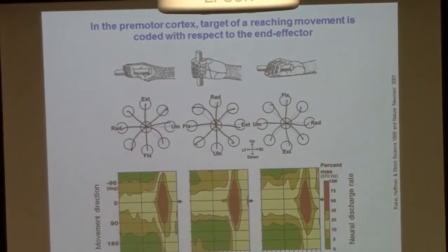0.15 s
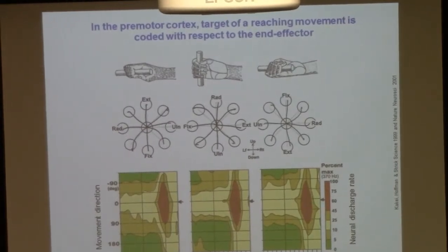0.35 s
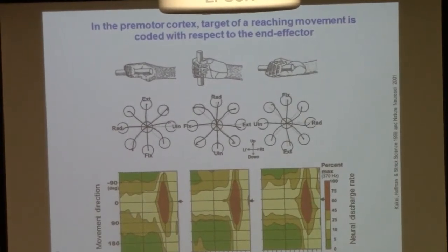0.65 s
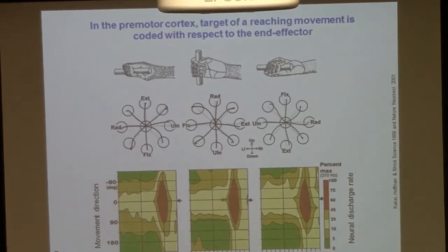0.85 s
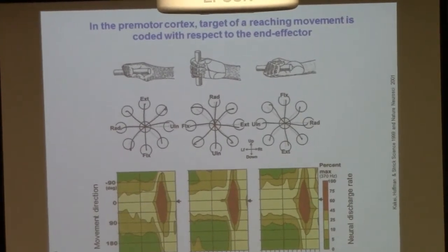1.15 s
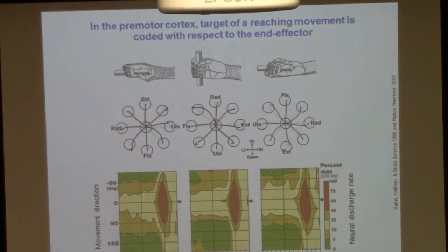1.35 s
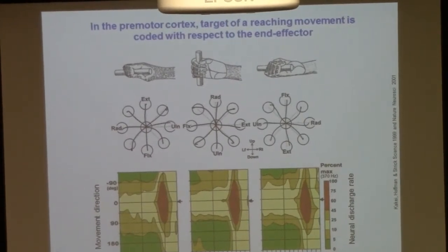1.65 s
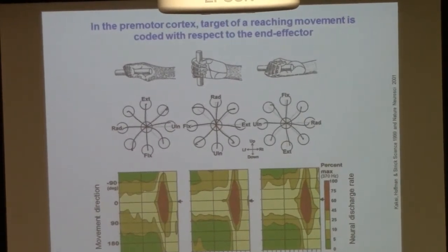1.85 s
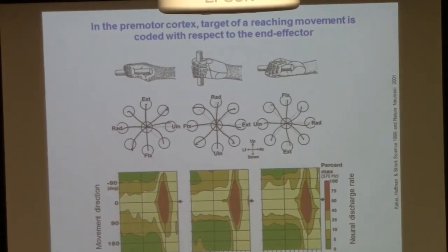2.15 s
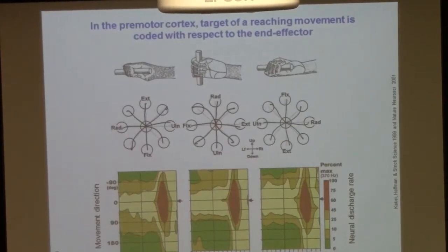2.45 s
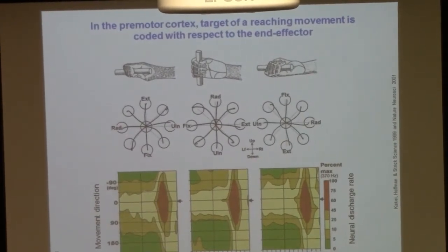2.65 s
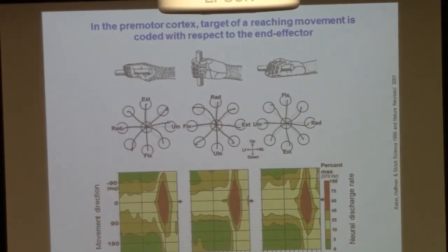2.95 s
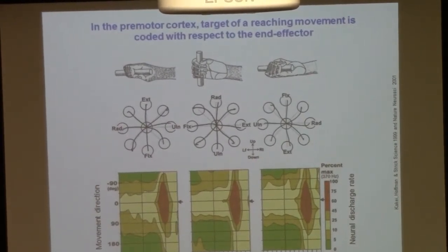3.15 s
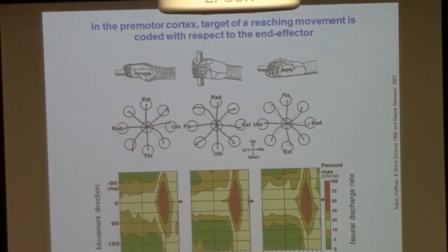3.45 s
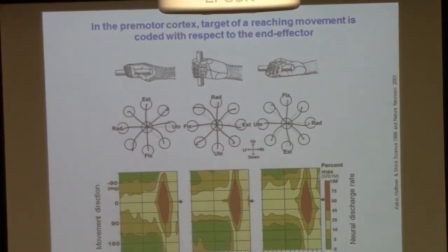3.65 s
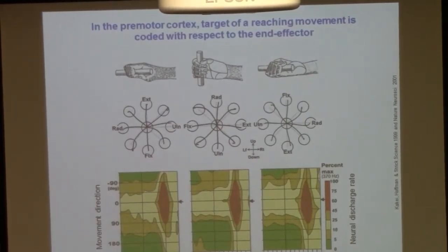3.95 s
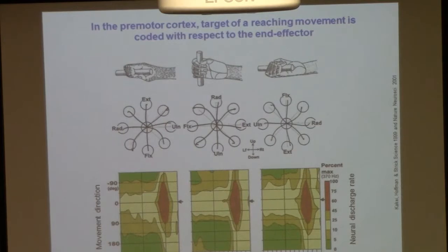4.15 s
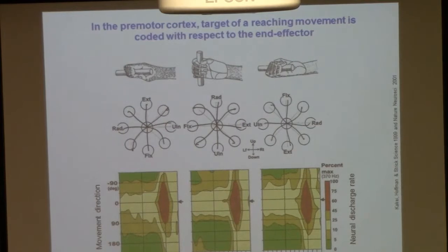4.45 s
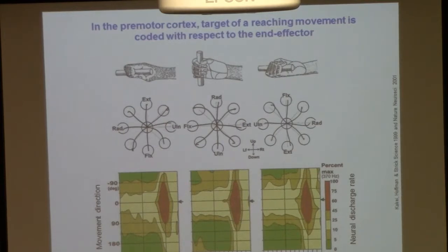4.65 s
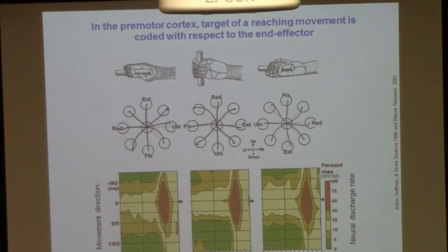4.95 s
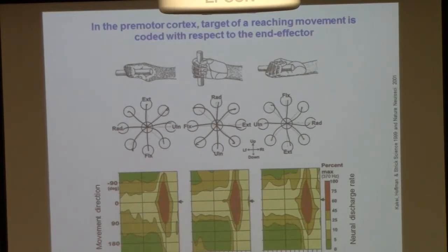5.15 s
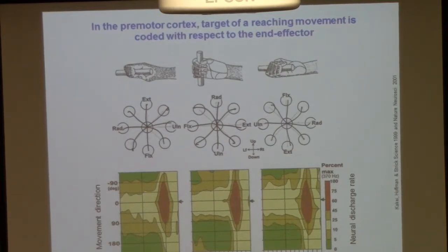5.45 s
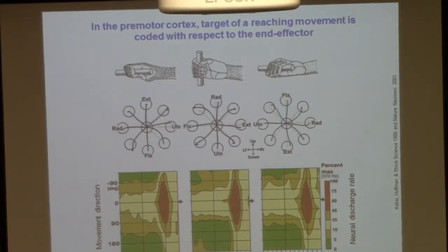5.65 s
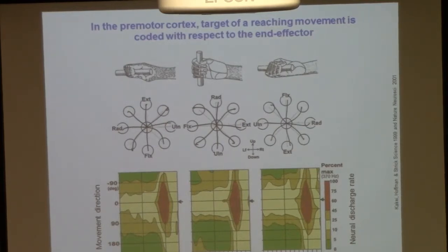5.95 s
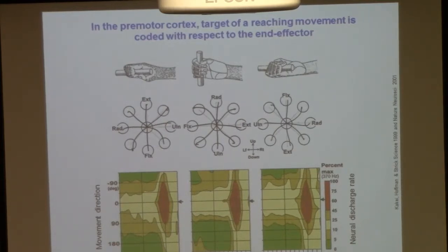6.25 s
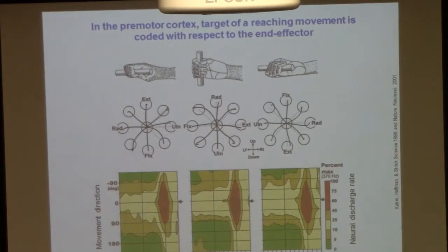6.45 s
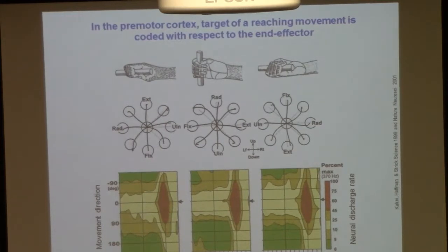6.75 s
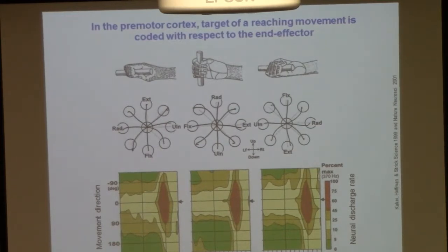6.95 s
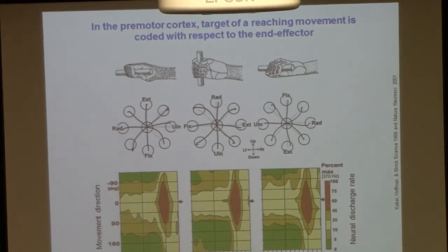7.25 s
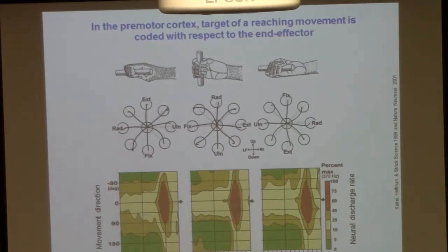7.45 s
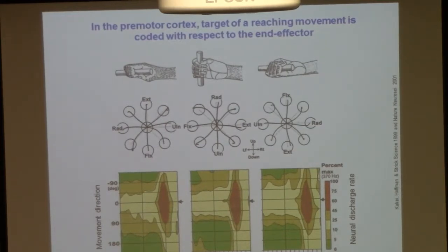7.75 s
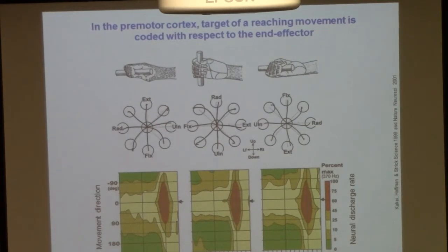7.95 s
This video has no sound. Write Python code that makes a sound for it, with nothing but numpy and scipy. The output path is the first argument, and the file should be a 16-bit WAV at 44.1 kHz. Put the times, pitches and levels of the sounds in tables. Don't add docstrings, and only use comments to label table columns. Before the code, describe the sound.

Electrical interference from an audio lead: steady sixty-cycle buzz with sharp, fizzy edges, faint ground hum and preamplifier hiss. Two quick bursts of contact crackle open it, the first with a dull pop, the second lighter and longer, firmer at its end. Then the buzz continues alone, shifting slightly in strength and left-right balance, loudest near six seconds, weaker near seven. Close, dry and quiet, without any audible room or talking.

```python
import sys
import numpy as np
from scipy import signal
from scipy.fft import rfft, irfft
from scipy.io import wavfile

SR = 44100
rng = np.random.default_rng(int(sys.argv[2]) if len(sys.argv) > 2 else 0)


def generate_wav(sig):
    pcm = np.round(np.clip(np.atleast_2d(sig).T, -1, 1) * 32767).astype(np.int16)
    wavfile.write(sys.argv[1], SR, pcm)


def convert_level_to_amplitude(level_db):
    exponent = np.asarray(level_db, float) / 20
    return 10 ** exponent


N = 357210

MAINS_HZ, FIRST_ON_S = 59.9961, 0.01417
# after_turn_on_ms, step_size, spike_size
SWITCH_EDGES = [(-0.024, 2.677, 0.621), (0.02, 2.557, -1.066), (0.439, 0.803, 0.471), (0.829, 0.79, 0.637),
                (1.438, 0.907, -0.058), (2.522, -1.399, 0.061), (2.673, -4.675, -1.008),
                (5.515, -0.737, -0.375)]
# start_ms, length_ms, size
MAGNETISING = (-2.13, 4.91, 1.58)
# start_ms, size, time_constant_ms
CHARGE_DRAIN = (2.673, 4.072, 1.164)
# centre_hz, width_hz
RESONANCES = [
    (2982, 1409),
    (7920, 4894),
    (1714, 671),
]
OPPOSED_SHARE, BYPASS_SHARE = 0.237, 0.12

RESTING_DB = -58
# start_s, travel_s, arrival_pickup_db (third order)
HAND_MOVES = [(.36, 0.11, -60.5), (.46, .12, -58), (3.33, .15, -57), (3.52, .16, -58.5), (3.68, .14, -62.5),
              (5.28, .1, -61), (5.37, 0.092, -58), (5.47, 0.28, -55.5), (5.72, 0.18, -53),
              (6.75, 0.21, -60), (6.93, 0.21, -62.5), (7.9, 0.28, -56)]
# pickup_db, left_over_right_db
CHANNEL_LEAN = [(-62.5, 1), (-58.5, 1.9), (-56.5, 1.6), (-53, -1.1)]

# start_s, length_s, grit_db, thump_db
PLUG_SCRATCHES = [
    (0.052, 0.04, -51, -53),
    (.073, 0.0064, -50, -64),
    (0.653, 0.049, -58.5, -69),
    (0.702, .04, -57.5, -64),
    (0.744, 0.065, -65.5, -58),
    (0.786, 0.078, -60, -61),
    (0.844, 0.046, -53, -57),
    (0.875, 0.017, -52, -62),
]
FIRM_DB, CORNER_HZ, CORNER_OCT_PER_DB = -52.5, 800, 0.06
TOP_HZ, TOP_OCT_PER_DB = 8100, 0.53
THUMP_HZ = 150
# start_s, level_db
CONTACT_RESEATS = [
    (0.0855, -43),
    (.888, -58),
]
WOBBLE_HZ, WOBBLE_S, WOBBLE_SHARE = 220, 0.0098, 0.61
SAG_S, SAG_ONSET_S = 0.005, 0.00039
# start_s, length_s, share
PLUG_SHUNT = (.053, .034, .6)

SPARK_DB, SPARK_MS, SPARK_FROM_HZ = -3, 0.12, 5500
GROUND_DB, GROUND_LEAD_MS = -59.5, 5.04
# frequency_hz, density_db_per_hz
FLICKER_DENSITY = [(15, -83), (60, -95), (150, -98), (400, -102), (1200, -112), (2500, -110), (5000, -120)]
# frequency_hz, density_db_per_hz
HISS_DENSITY = [(20, -98), (80, -96.5), (250, -100), (700, -102), (2500, -103), (6000, -105), (12000, -108),
                (16000, -109)]
OFFSET = -0.0003


def mains_turns():
    return (np.arange(N) / SR - FIRST_ON_S) * MAINS_HZ


def current_cycle(lopsided, size=8192):
    order = np.arange(1, 250)
    s = 2j * np.pi * order * MAINS_HZ / 1000
    rings = 2 * np.pi * np.array(RESONANCES) / 1000
    line_rad_per_ms = rings[0, 0]

    edges = 0
    for at_ms, step, spike in SWITCH_EDGES:
        edges = edges + (step / s + spike * s / line_rad_per_ms ** 2) * np.exp(-s * at_ms)
    drain_start_ms, charge, drain_ms = CHARGE_DRAIN
    edges = edges + charge * np.exp(-s * drain_start_ms) / (s + 1 / drain_ms)

    line, lead, branch = (w ** 2 / (s ** 2 + width * s + w ** 2) for w, width in rings)
    path = line * (lead - OPPOSED_SHARE * branch - BYPASS_SHARE)

    start_ms, length_ms, swell = MAGNETISING
    arch = np.pi / length_ms
    hump = swell * arch * (1 + np.exp(-s * length_ms)) / (s ** 2 + arch ** 2) * np.exp(-s * start_ms)

    spectrum = np.where(order % 2, edges * path + hump, -lopsided * path)
    return irfft(np.r_[0, spectrum], size) * size / np.sqrt(2) / abs(spectrum[2])


def pickup():
    t = np.arange(N) / SR
    level_db = np.full(N, float(RESTING_DB))
    before_db = RESTING_DB
    for start_s, travel_s, arrival_db in HAND_MOVES:
        level_db += (arrival_db - before_db) * np.clip((t - start_s) / travel_s, 0, 1)
        before_db = arrival_db
    lean_db = np.interp(level_db, *np.transpose(sorted(CHANNEL_LEAN)))
    return level_db + np.outer([0.5, -0.5], lean_db)


def buzz():
    cycle = current_cycle(lopsided=0.024)
    halves = np.arange(-2, 2 * MAINS_HZ * N / SR + 1) / 2
    late, strength_db = rng.standard_normal((len(halves), 2)).T
    jitter_s = 5e-6 * late
    turns = mains_turns() + np.interp(mains_turns(), halves, jitter_s * MAINS_HZ)
    wave = np.interp(turns % 1, np.arange(len(cycle)) / len(cycle), cycle, period=1)
    return wave * convert_level_to_amplitude(pickup() + 0.37 * np.interp(turns, halves, strength_db))


def sparks():
    since_ms = mains_turns() % 1 * 1000 / MAINS_HZ
    highpass = signal.butter(2, SPARK_FROM_HZ, "highpass", fs=SR, output="sos")
    hiss = signal.sosfilt(highpass, rng.standard_normal(N))
    return hiss * np.exp(-since_ms / SPARK_MS) * convert_level_to_amplitude(pickup() + SPARK_DB)


def shunt():
    start_s, length_s, share = PLUG_SHUNT
    from_middle_s = np.arange(N) / SR - start_s - length_s / 2
    return 1 - share * np.exp(-(from_middle_s / (length_s / 2)) ** 8)


def evened(x):
    return x / np.sqrt(np.mean(x ** 2) + 1e-20)


def lowpass(x, hz, order):
    return signal.sosfilt(signal.butter(order, hz, fs=SR, output="sos"), x)


def scratches():
    click_db = 3.5 * np.minimum(rng.exponential(1, N), 3)
    clicks = convert_level_to_amplitude(click_db) * (rng.random(N) < 4500 / SR)
    clicks = clicks - clicks.mean()
    band = signal.butter(2, [THUMP_HZ / 2.8, THUMP_HZ * 1.65], "bandpass", fs=SR, output="sos")
    lurch = signal.sosfilt(band, rng.standard_normal(N))
    out = np.zeros(N)
    for start_s, length_s, grit_db, thump_db in PLUG_SCRATCHES:
        span = slice(round(start_s * SR), round((start_s + length_s) * SR))
        firm_db = grit_db - FIRM_DB
        top_hz = min(TOP_HZ * 2 ** (TOP_OCT_PER_DB * firm_db), SR / 3)
        grit = lowpass(clicks[span], top_hz, order=2)
        grit = lowpass(grit, CORNER_HZ * 2 ** (CORNER_OCT_PER_DB * firm_db), order=1)
        scrape = convert_level_to_amplitude(grit_db) * evened(grit) + convert_level_to_amplitude(thump_db) * evened(lurch[span])
        out[span] += scrape * signal.windows.tukey(len(grit), 0.6)
    return out


def reseats():
    start_s, level_db = np.transpose(CONTACT_RESEATS)
    since_s = np.maximum(np.arange(N) / SR - start_s[:, None], 0)
    sag = np.exp(-since_s / SAG_S) * (1 - np.exp(-since_s / SAG_ONSET_S))
    wobble = np.sin(2 * np.pi * WOBBLE_HZ * since_s) * np.exp(-(since_s / WOBBLE_S) ** 4)
    return -convert_level_to_amplitude(level_db) @ (sag + WOBBLE_SHARE * wobble)


def ground_hum():
    turns = mains_turns() + GROUND_LEAD_MS * MAINS_HZ / 1000
    return np.sqrt(2) * convert_level_to_amplitude(GROUND_DB) * np.cos(2 * np.pi * turns)


def noise(density, channels):
    hz, db = np.transpose(density)
    bins_hz = np.fft.rfftfreq(N, 1 / SR)
    shape = convert_level_to_amplitude(np.interp(np.log(bins_hz + 1), np.log(hz), db))
    return irfft(rfft(rng.standard_normal((channels, N))) * shape * np.sqrt(SR / 2), N)


def flicker():
    shared, *own = noise(FLICKER_DENSITY, channels=3)
    return (shared + 0.68 * np.array(own)) * convert_level_to_amplitude(0.6 * (pickup() - RESTING_DB))


def preamp_hiss():
    return noise(HISS_DENSITY, channels=2)


def scene():
    mains = (buzz() + ground_hum()) * shunt()
    plug = scratches() + reseats()
    return mains + sparks() + plug + flicker() + preamp_hiss()


def roll_off(x):
    return signal.sosfilt(signal.butter(12, 15650, fs=SR, output="sos"), x)


def record(dry):
    mix = dry + OFFSET
    return roll_off(mix)


dry = scene()
out = record(dry)
generate_wav(out)
```